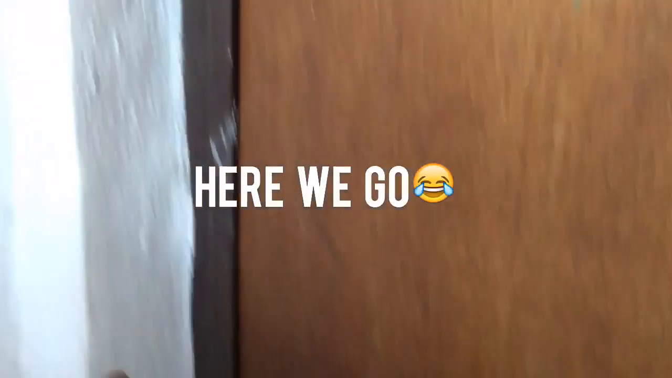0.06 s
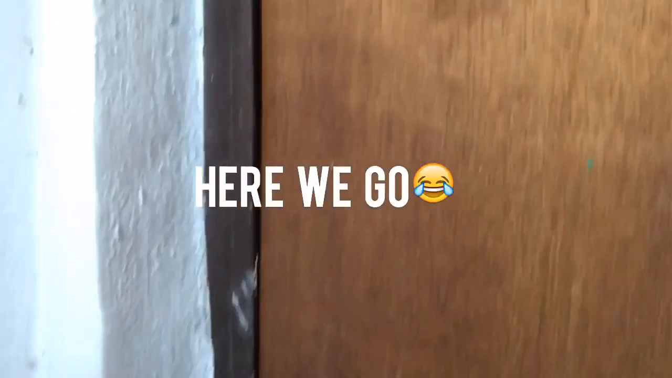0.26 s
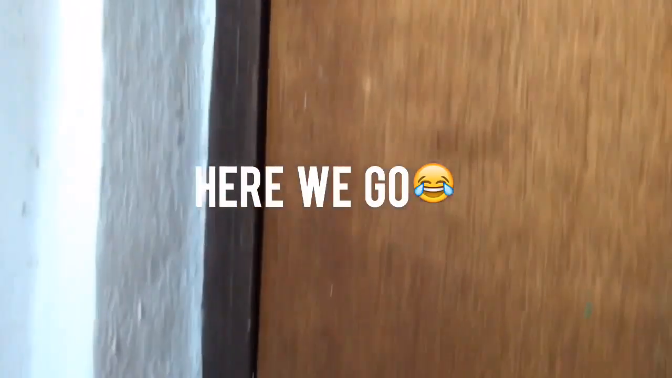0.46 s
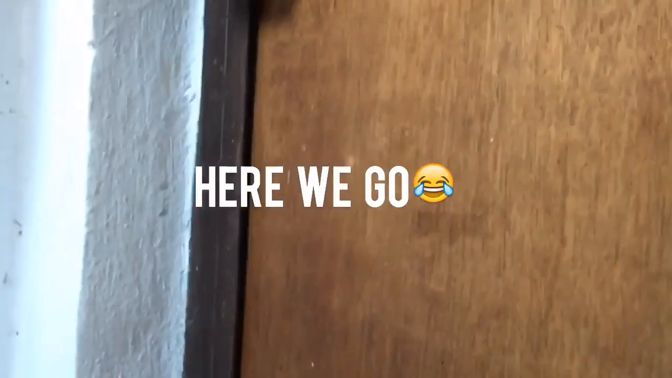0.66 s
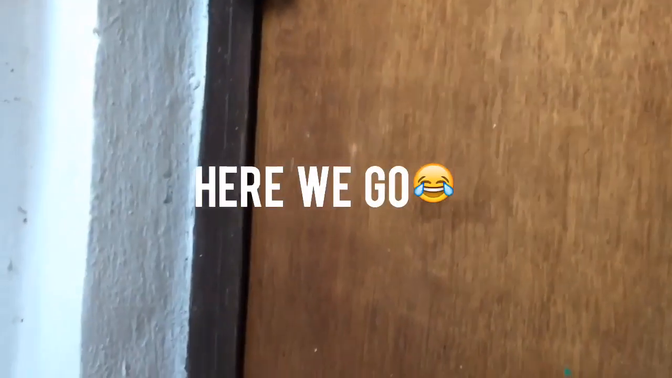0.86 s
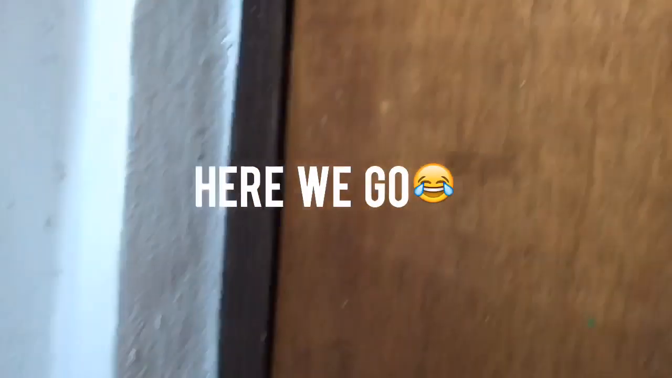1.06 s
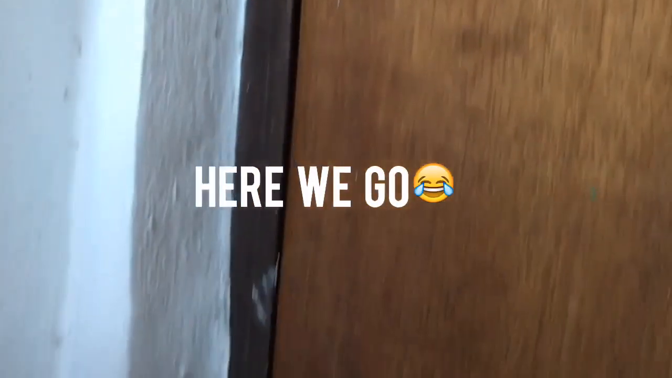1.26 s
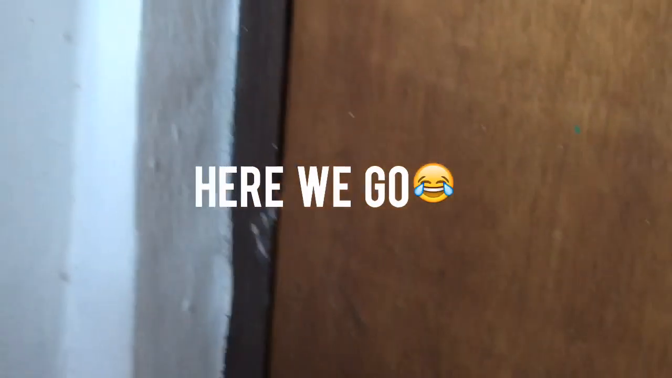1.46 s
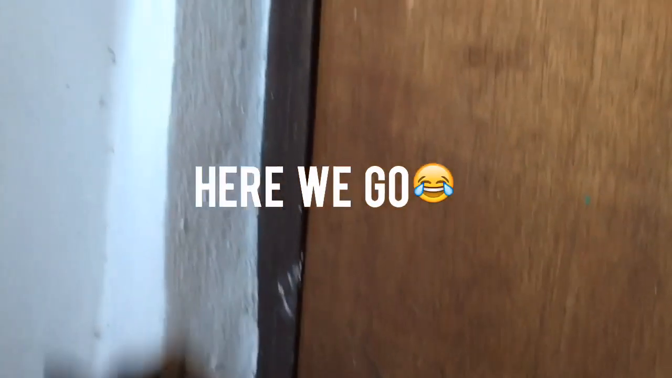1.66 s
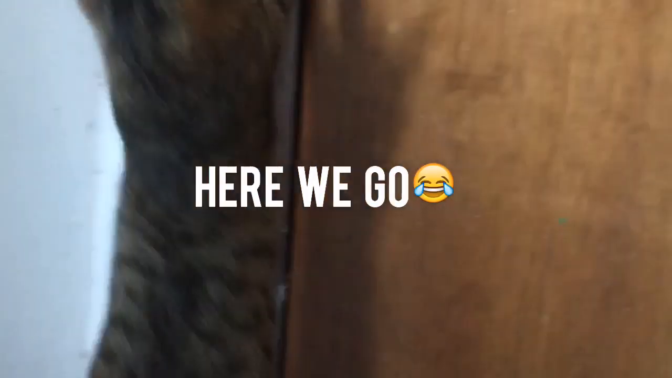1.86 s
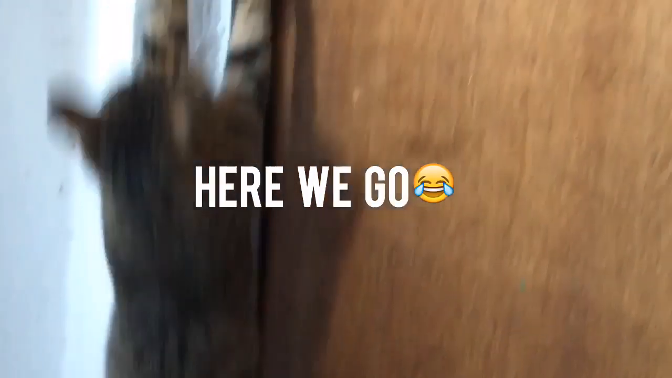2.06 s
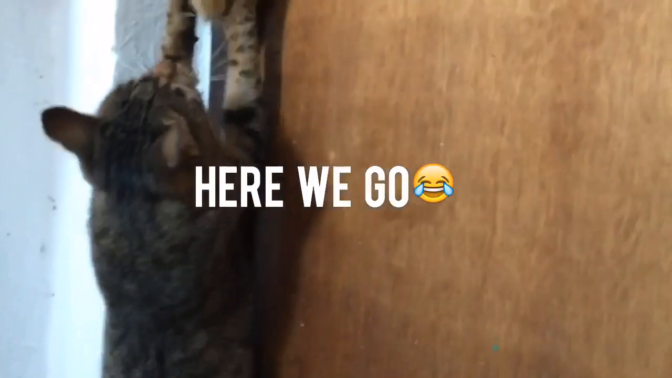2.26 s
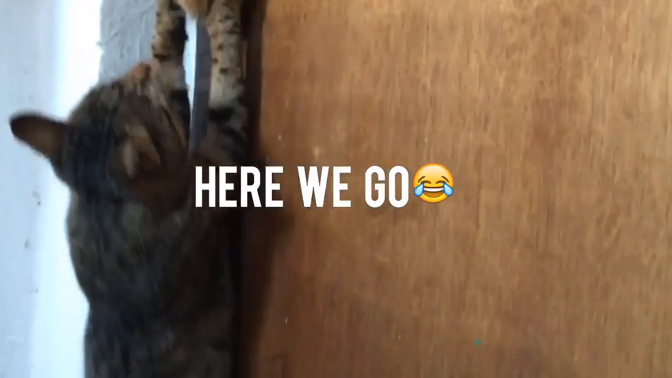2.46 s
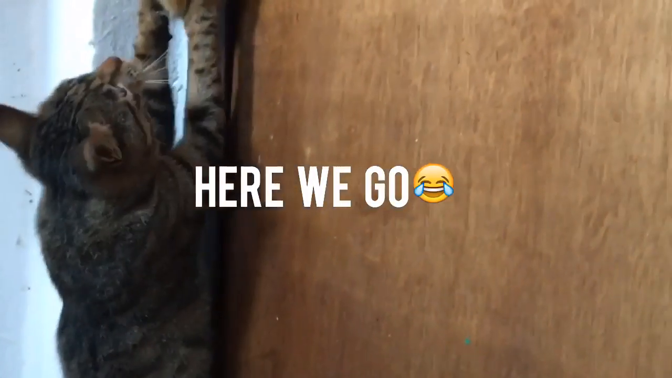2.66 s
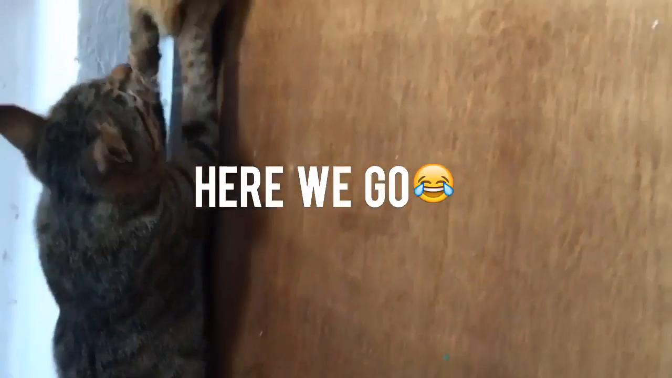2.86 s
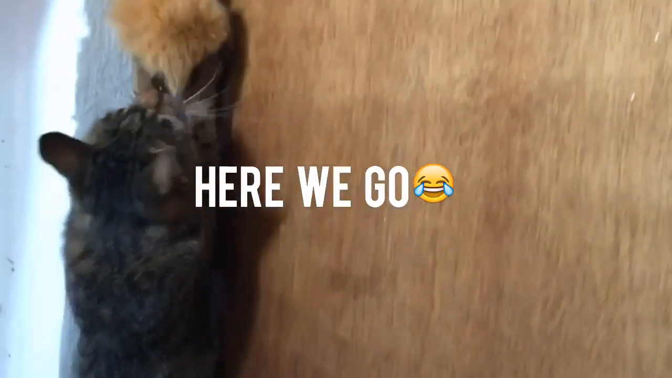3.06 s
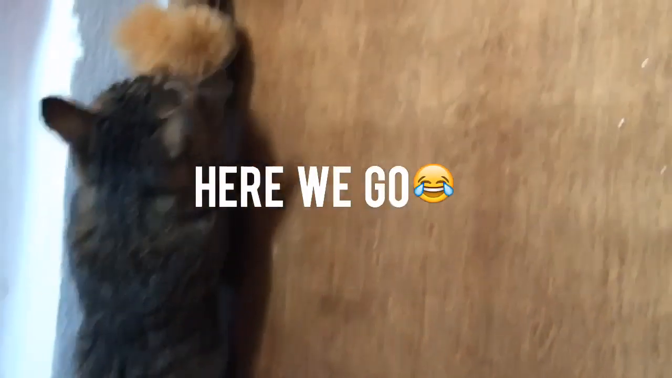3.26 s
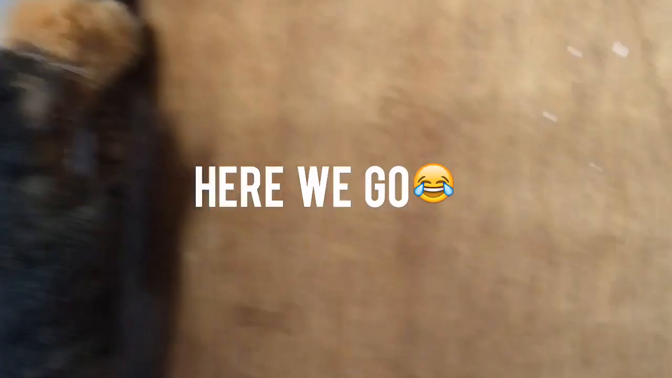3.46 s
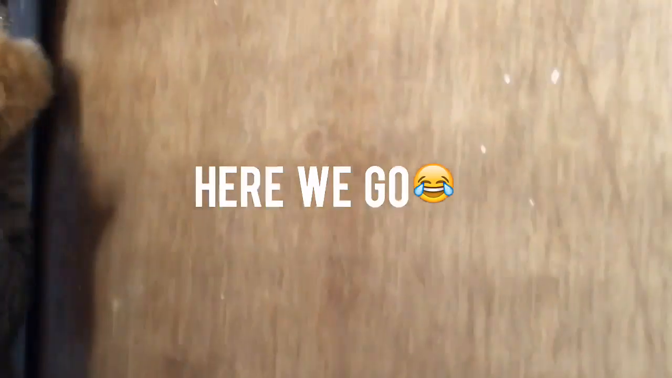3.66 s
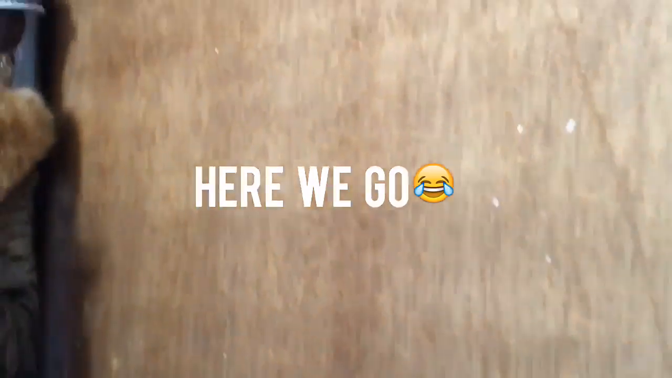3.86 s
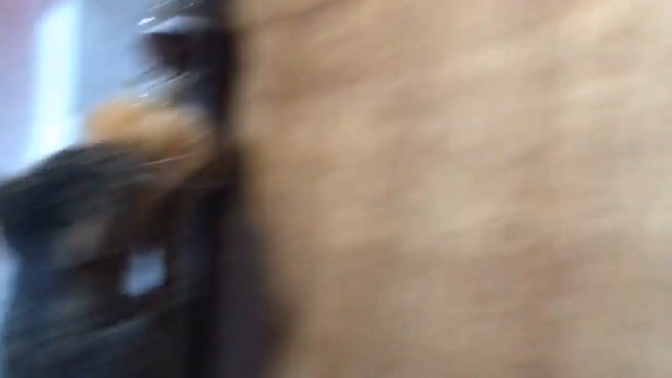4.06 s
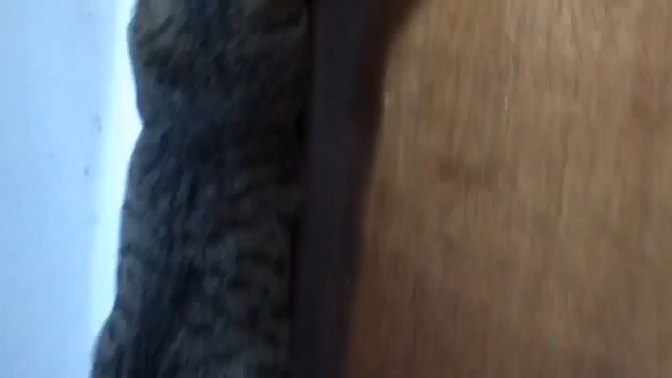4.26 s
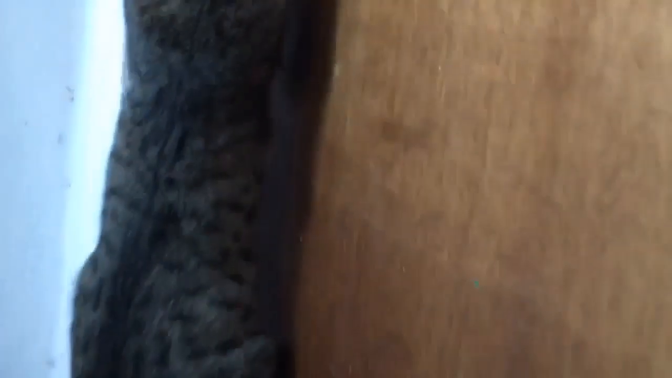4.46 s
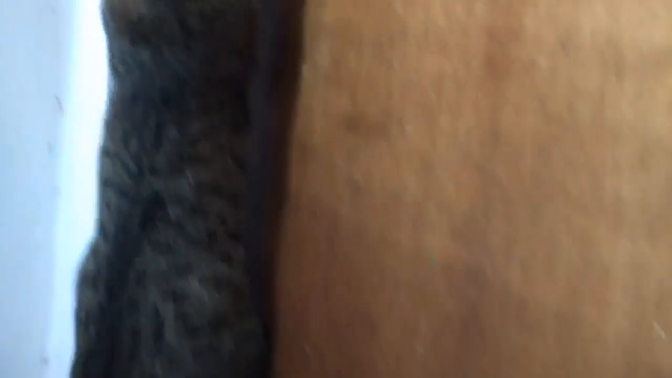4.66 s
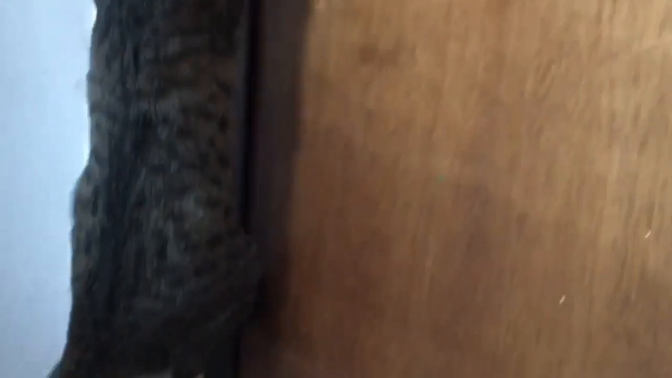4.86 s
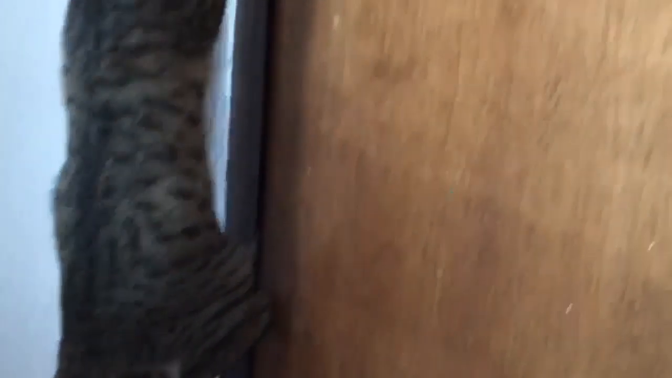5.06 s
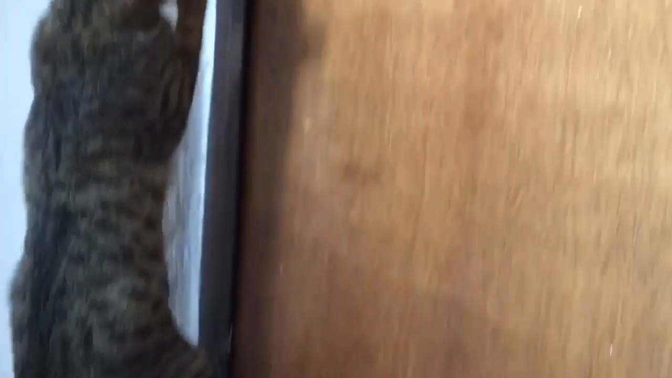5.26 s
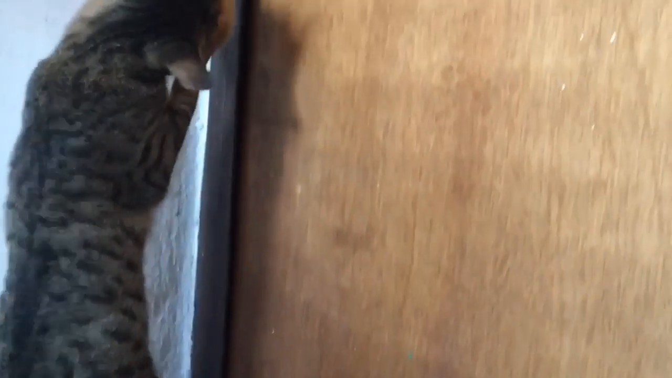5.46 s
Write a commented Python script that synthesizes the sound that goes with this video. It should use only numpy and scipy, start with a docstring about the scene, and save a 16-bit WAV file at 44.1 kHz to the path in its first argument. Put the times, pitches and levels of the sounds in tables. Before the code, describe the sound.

In a small, hard-walled room, a cat gives one soft, level meow. After a pause it leaps at a wooden door: claws rake the wood close to the microphone, and a key squeaks and clinks brightly on its holder amid sharp knocks. The loose door then shudders and thumps in its frame while the cat keeps scratching in short bursts, over a low room rumble.

```python
"""A small hard-walled room. A cat meows once, then leaps at a wooden door and hangs from its key ring.
The meow is a gliding harmonic tone shaped by throat and mouth. Claws and fur scratch down the wood,
close to the microphone, and ring the panel. The steel key squeaks by stick-slip and clinks on its
holder; the door knocks, shudders and thumps in its frame. A low room rumble lies under it all."""
import sys
import numpy as np
from scipy import signal
from scipy.fft import rfft, irfft, next_fast_len
from scipy.io import wavfile
from scipy.ndimage import map_coordinates

SR = 44100
rng = np.random.default_rng(int(sys.argv[2]) if len(sys.argv) > 2 else 0)


def file_out(sig):
    """Save sig as 16-bit WAV at sys.argv[1]."""
    # one column per channel
    cols = np.atleast_2d(sig).T
    # limit, then scale
    lim = np.clip(cols, -1, 1)
    pcm = np.round(lim * 32767).astype(np.int16)
    wavfile.write(sys.argv[1], SR, pcm)


N = 242550  # 5.5 s

# room noise spectrum: f/Hz, level/dB
AIR_SPECTRUM = [(15, -38), (40, -6.5), (77, -1.5), (204, -21), (319, -19.5), (558, -28), (2020, -36.5),
                (16000, -47.5)]
# room decay: f/Hz, t60/s
ROOM_DECAY = [(150, 1), (1000, 0.52), (4000, 0.47), (14000, 0.14)]
# meow contour: t/s, pitch/Hz, level/dB, mouth opening/0-1, tongue resonance/Hz, lip resonance/Hz
MEOW_CONTOUR = [(.793, 470, -60, 0.4, 2840, 5230), (.86, 483.3, -46.5, 1, 2840, 4900),
                (.92, 500, -45.5, 0.75, 3000, 5500), (.97, 501.6, -44.5, 0.79, 3360, 5770),
                (1.03, 507.8, -44, 0.56, 3510, 5950), (1.12, 508.3, -44, 0.57, 3750, 6000),
                (1.19, 501, -46.5, 0.57, 3700, 6020), (1.27, 475, -49.5, 0.51, 3180, 5820),
                (1.34, 467, -55.5, 0.43, 2650, 5170), (1.39, 445.7, -54.5, 0.23, 2284, 4100),
                (1.445, 403, -45, 0.3, 2050, 3650)]
# throat and mouth response: f/Hz, level/dB
THROAT_SPECTRUM = [(450, -12), (1000, 1), (1500, -15), (2000, -4), (2500, -19), (3300, -23), (4500, -22.5),
                   (6700, -32.5), (8200, -29), (9500, -44), (14000, -46)]
# change from closed to open mouth: f/Hz, gain/dB
OPENING_GAIN = [(500, -43), (1000, -19), (1500, 17), (2000, 23), (4000, -6.5)]
# a paw lands and rakes the wood: t/s, hold/s, level/dB, tilt/(dB/oct)
CLAW_SWIPES = [(2.205, 0.076, -59, -2), (2.264, 0.11, -41.5, -5.5), (2.618, 0.035, -51, 0.5),
               (3.185, 0.029, -60.5, 4.5), (3.792, 0.0035, -49.5, -0.5), (3.884, 0.028, -32.5, 0),
               (4.033, 0.052, -33.5, 1), (4.148, 0.019, -50, 11), (4.503, 0.028, -47.5, 12),
               (4.771, 0.05, -50, -1.5), (5.053, 0.07, -46, -2.5), (5.205, 0.053, -57.5, 5)]
# a hooked claw drags ever harder, then lets go: t/s, rise/s, level/dB, tilt/(dB/oct)
CLAW_DRAGS = [(2.282, 0.14, -35, -4.5), (3.957, 0.041, -35, 1), (4.308, 0.11, -41.5, 2),
              (4.97, 0.049, -55.5, 3)]
# a claw snaps free: t/s, level/dB, tilt/(dB/oct)
CLAW_SNAPS = [(3.163, -60, 5.5), (3.343, -52.5, 0), (3.377, -49.5, 1.5), (3.42, -47.5, 1),
              (3.919, -54, 1.5), (4.044, -26.5, 2.5), (4.113, -37, 1), (4.508, -36, 6.5),
              (4.738, -46.5, 3.5), (4.86, -52.5, 7), (5.063, -36, 6), (5.069, -32.5, 6), (5.107, -27.5, 7)]
# claw on wood: f/Hz, level/dB
CLAW_SPECTRUM = [(200, -22.5), (455, -9), (1040, -4), (1500, -4), (2350, -1), (2900, -9), (3500, -3.5),
                 (4700, -9.5), (6620, -7.5), (7820, -11.5), (12300, -12.5), (16000, -21)]
# resonances of the thin door panel: f/Hz
PANEL_MODES_HZ = [480, 575, 705, 965, 1045, 1310, 2060, 2300]
# key holder and paws rap on the frame: t/s, level/dB, favoured f/Hz
FRAME_KNOCKS = [(2.209, -53.5, 1480), (2.411, -37, 2260), (2.493, -30, 1100), (2.499, -29.5, 295),
                (2.523, -32, 313), (2.553, -37, 296), (2.578, -41.5, 296), (2.631, -34, 704),
                (2.666, -46, 856), (2.702, -39.5, 476), (3.801, -50.5, 2300), (3.896, -40, 690),
                (3.92, -35.5, 1250), (3.999, -44, 2500), (4.049, -42, 2120)]
# wooden frame: f/Hz, level/dB, t60/s
FRAME_MODES = [(301, 1.5, 0.12), (460, 1, 0.053), (710, -5, .085), (870, 2, 0.03), (1110, -2, .04),
               (1273, 0.5, 0.049), (1705, 2.5, .04), (2100, 1.5, 0.017), (2590, -3.5, 0.059)]
# key and ring meet: t/s, level/dB, relative click level/dB, favoured f/Hz
KEY_CLINKS = [(2.221, -58, 11, 11580), (2.278, -40.5, -4, 11500), (2.392, -21.5, 5, 12300),
              (2.411, -22, -9, 9500), (2.4225, -15, -9, 11800), (2.446, -30.5, -1, 12300),
              (2.477, -43.5, 5, 12500), (2.518, -40, 4.5, 12280), (2.621, -28, 2, 13000),
              (2.631, -27, 3.5, 9600), (2.693, -52.5, 1.5, 9720), (2.702, -46, 12, 12500),
              (2.718, -41.5, 10, 10790), (3.598, -55, 0.5, 13000), (3.646, -45, 2.5, 13300),
              (4.445, -62.5, 9.5, 12000)]
# steel key: f/Hz, level/dB, t60/s
STEEL_MODES = [(6850, -14.5, .07), (9100, -5.5, 0.046), (10960, -5.5, 0.036), (11700, -15.5, .1),
               (12000, -5.5, 0.064), (12465, -6, .08), (12640, -4, .06), (13500, -7.5, 0.034),
               (14920, -2, .03), (15530, -6, .04)]
# the ring slides on its holder: t/s, hold/s, level/dB, squeak f/Hz, roughness/0-1
RING_SLIDES = [(2.266, .074, -39, 12500, .75), (2.346, 0.018, -17, 12400, .2),
               (2.368, 0.054, -25, 12080, .65), (2.372, .005, -28.5, 9040, .2),
               (2.412, .007, -23, 11980, .5), (2.609, .008, -44, 9700, .95)]
# steel contact noise: f/Hz, level/dB
STEEL_SPECTRUM = [(3500, -29), (6500, -12), (9000, -2), (13000, 4), (16000, -7)]
# the cat's weight leans on the door: t/s, hold/s, level/dB, t60/s
DOOR_SHOVES = [(2.392, 0.044, -45.5, 1), (2.688, .01, -33.5, 0.23), (2.84, 0.16, -34, 0.4),
               (3.305, 0.13, -37, 0.63), (3.592, 0.023, -36, 0.55), (3.924, 0.072, -28.5, 0.18),
               (4.232, 0.15, -37.5, 1), (4.707, 0.05, -34.5, 0.82)]
# the cat's body brushes the door: t/s, hold/s, level/dB
FUR_BRUSHES = [(2.576, 0.1, -52), (3.558, 0.085, -59), (4.298, 0.045, -50), (5.175, 0.067, -63.5)]
# fur on wood: f/Hz, level/dB
FUR_SPECTRUM = [(100, -5), (300, 7), (1300, 4), (2300, -1), (3500, -13), (16000, -13.5)]
# paws and body hit the door: t/s, level/dB, low-pass f/Hz
DOOR_THUMPS = [(2.657, -29, 141), (2.701, -36, 130.3), (2.822, -34, 89.6), (3.343, -23.5, 297),
               (3.377, -25, 556), (3.406, -34, 377), (3.448, -31.5, 199), (3.911, -27, 242),
               (3.945, -20, 234), (4.052, -25, 210), (4.107, -33, 164), (4.661, -28, 105)]
# whole door: f/Hz, level/dB, t60/s
DOOR_MODES = [(47.24, -13, 0.15), (79.2, 10.5, 0.42), (102.4, 15, 0.087), (119.8, -2, 0.35),
              (182.6, 0, 0.319), (239.7, -7, 0.3), (294, -4, 0.19), (341, -2, 0.19)]


def amp(db):
    """Decibels to gain."""
    return 10 ** (np.asarray(db) / 20)


def unit(x):
    """Scale to rms 1."""
    return x / np.sqrt(np.mean(x ** 2) + 1e-20)


def along(points, hz):
    """Interpolate (f/Hz, value) points on a log axis."""
    f, values = np.transpose(points)
    return np.interp(np.log(hz + 1), np.log(f + 1), values)


def wobble(rate_hz, size=N):
    """Smooth random curve, rate_hz knots a second."""
    knots = rng.standard_normal(int(size * rate_hz / SR) + 4)
    return map_coordinates(knots, [np.arange(size) * rate_hz / SR])


def filtered(x, response):
    """Apply a gain given as a function of frequency."""
    size = next_fast_len(len(x) + SR // 4)
    return irfft(rfft(x, size) * response(np.fft.rfftfreq(size, 1 / SR)), size)[:len(x)]


def coloured(x, spectrum, tilt_db_oct=0):
    """Shape x by a spectrum and a tilt; rms 1."""
    return unit(filtered(x, lambda hz: amp(along(spectrum, hz) + tilt_db_oct * np.log2(hz + 1))))


def noise(size, spectrum, tilt_db_oct=0):
    """Coloured Gaussian noise; rms 1."""
    return coloured(rng.standard_normal(size), spectrum, tilt_db_oct)


def grit(size, rate_hz, spread_db):
    """Tiny slips: random times, uneven sizes."""
    slips = (rng.random(size) < rate_hz / SR) * rng.standard_normal(size)
    return slips * amp(spread_db * rng.standard_normal(size))


def fade(t, t60_s):
    """Exponential decay."""
    return np.exp(-np.log(1000) * t / t60_s)


def swell(start_s, hold_s, t60_s, rise_db_per_s):
    """Envelope: grows until start_s, holds, decays."""
    t = np.arange(N) / SR - start_s
    return amp(rise_db_per_s * np.minimum(t, 0)) * fade(np.maximum(t - hold_s, 0), t60_s)


def stroke(t, rise_s, hold_s, t60_s):
    """Contact force: power-law build, hold, release."""
    return np.clip(t / rise_s, 0, 1) ** 1.7 * fade(np.maximum(t - rise_s - hold_s, 0), t60_s)


def ring(modes, t, scatter_db=3, in_step=False):
    """Struck damped modes, starting near rms 1; a broad push starts them in step."""
    hz, db, t60_s = np.transpose(modes)[:, :, None]
    gain = amp(db + scatter_db * rng.standard_normal(db.shape))
    if not in_step:
        gain *= rng.choice([-1, 1], db.shape)
    partials = gain * np.sin(2 * np.pi * hz * t) * fade(t, t60_s)
    return np.sum(partials, 0) / np.sqrt(np.sum(gain ** 2) / 2)


def favouring(modes, centre_hz, fall_db_oct):
    """The struck spot favours modes near centre_hz."""
    return [(hz, db - fall_db_oct * abs(np.log2(hz / centre_hz)), t60_s) for hz, db, t60_s in modes]


def add(track, start_s, sound):
    """Mix a sound in at start_s."""
    part = track[round(start_s * SR):][:len(sound)]
    part += sound[:len(part)]


def air(level_db=-58):
    """Low, slightly restless room rumble under thin hiss."""
    return amp(level_db + 0.52 * wobble(5.5)) * noise(N, AIR_SPECTRUM)


def meow(scoop_s=0.016, release_s=0.046):
    """Harmonic voice: drops onto its note, brightens with effort and opening, creaks at both ends."""
    t = np.arange(N) / SR
    times_s, *columns = np.transpose(MEOW_CONTOUR)
    pitch_hz, db, mouth, tongue_hz, lip_hz = [np.interp(t, times_s, column) for column in columns]
    start_s, end_s = times_s[0], times_s[-1]
    gate = (t >= start_s) & (t <= end_s)
    creak = np.exp(-((t - start_s) / 0.016) ** 2) + np.exp(-((t - end_s) / 0.02) ** 2)
    pitch_hz *= 1 + 0.0022 * wobble(55) + (0.004 + 0.08 * creak) * wobble(700)
    scoop = 1 + 0.18 * np.exp(-np.abs(t - start_s) / scoop_s)
    phase = 2 * np.pi * np.cumsum(pitch_hz * scoop)[gate] / SR
    effort_db = db[gate] - db.max()
    voice, power = np.zeros(N), np.zeros(N)
    for k in range(1, 31):
        hz = k * pitch_hz[gate]
        opening_db = along(OPENING_GAIN, hz) * (mouth[gate] - 0.6)
        tongue_db = 8.5 * np.exp(-((hz - tongue_hz[gate]) / 400) ** 2)
        lip_db = 13.3 * np.exp(-((hz - lip_hz[gate]) / 350) ** 2)
        treble_db = 0.6 * effort_db * np.clip(np.log2(hz / 2000), 0, 1)
        waver_db = np.clip(k / 2, 1.2, 2.8) * wobble(20, len(hz))
        gain = amp(along(THROAT_SPECTRUM, hz) + opening_db + tongue_db + lip_db + treble_db + waver_db)
        voice[gate] += gain * np.sin(k * phase)
        power[gate] += gain ** 2 / 2
    release = np.clip((end_s - t) / release_s, 0, 1)
    rasp = noise(N, [(300, -25), (620, -1), (1900, -22), (2600, -37), (9000, -44)])
    return gate * (amp(db) * release * voice / np.sqrt(power + 1e-12) + amp(-56) * creak * rasp)


def near_walls(x, gain=0.12):
    """Early floor and wall reflections: harmonics swell and sink as the pitch glides."""
    delays = rng.integers(SR // 200, SR // 25, 8)
    return x + gain * sum(np.pad(x, (delay, 0))[:N] for delay in delays)


def room(x):
    """Wall reverberation: each frequency decays at its own rate."""
    hz, t, bins = signal.stft(rng.standard_normal(SR * 3 // 4), SR, nperseg=256)
    tail = signal.istft(bins * fade(t, along(ROOM_DECAY, hz)[:, None]), SR, nperseg=256)[1]
    tail = np.pad(tail, (SR // 200, 0))
    return signal.fftconvolve(x, tail / np.linalg.norm(tail))[:N]


def moving_echo(x, rate_hz=0.6):
    """The echo shifts as the cat moves: two room responses, crossfaded."""
    angle = 2 * np.pi * rate_hz * np.arange(N) / SR
    return room(x * np.cos(angle)) + room(x * np.sin(angle))


def on_wood(x):
    """Each spot of the door adds its own narrow peaks and dips."""
    ripple_db = 2.9 * rng.standard_normal(130)
    return unit(filtered(x, lambda hz: amp(map_coordinates(ripple_db, [0.8 * np.sqrt(hz)]))))


def travelling(make_sound, spots_per_s=18):
    """Moving contact point: three versions of a sound in drifting shares."""
    versions = np.array([make_sound() for _ in range(3)])
    shares = np.array([wobble(spots_per_s, len(version)) for version in versions])
    return np.sum(versions * shares, 0) / np.linalg.norm(shares, axis=0)


def scrape(force, tilt_db_oct):
    """A claw crosses the grain: dense tiny slips, a few hard catches."""
    def spot():
        slips = unit(grit(len(force), rate_hz=7000, spread_db=2))
        catches = unit(grit(len(force), rate_hz=250, spread_db=1))
        return on_wood(coloured(slips + 0.38 * catches, CLAW_SPECTRUM, tilt_db_oct))
    return force * travelling(spot)


def claws():
    """Claws swipe the wood, drag while hooked, snap free."""
    out, t = np.zeros(N), np.arange(SR // 2) / SR
    for start_s, hold_s, db, tilt_db_oct in CLAW_SWIPES:
        force = stroke(t, rise_s=0.0075, hold_s=hold_s, t60_s=0.04)
        add(out, start_s, amp(db) * scrape(force, tilt_db_oct))
    for start_s, rise_s, db, tilt_db_oct in CLAW_DRAGS:
        force = stroke(t, rise_s, hold_s=0, t60_s=0.019)
        add(out, start_s, amp(db) * scrape(force, tilt_db_oct))
    for start_s, db, tilt_db_oct in CLAW_SNAPS:
        snap = on_wood(noise(len(t), CLAW_SPECTRUM, tilt_db_oct))
        add(out, start_s, amp(db) * snap * (fade(t, 0.036) + 0.31 * fade(t, 0.156)))
    return out


def panel(x, width_hz=32):
    """The thin door panel rings under every scrape."""
    ringing = sum(signal.lfilter(*signal.iirpeak(hz, hz / width_hz, fs=SR), x) for hz in PANEL_MODES_HZ)
    return amp(-0.5) * x + amp(-1.5) * ringing


def knocks():
    """Sharp raps on the wooden frame, with little bass."""
    out, t = np.zeros(N), np.arange(SR // 2) / SR
    for start_s, db, centre_hz in FRAME_KNOCKS:
        body = ring(favouring(FRAME_MODES, centre_hz, fall_db_oct=11.5), t, scatter_db=1)
        crack = noise(len(t), [(400, -5.5), (2400, -9.5), (4000, -26.5), (12000, -17)])
        add(out, start_s, amp(db) * (1.04 * body + 0.58 * crack * fade(t, 0.099)))
    return signal.lfilter(*signal.butter(2, 220, "high", fs=SR), out)


def clinks():
    """Key strikes ring: a hard click plus steel modes."""
    out, t = np.zeros(N), np.arange(SR // 3) / SR
    for start_s, db, click_db, centre_hz in KEY_CLINKS:
        click = noise(len(t), STEEL_SPECTRUM) * (fade(t, 0.016) + 0.31 * fade(t, 0.1))
        body = ring(favouring(STEEL_MODES, centre_hz, fall_db_oct=17.5), t, scatter_db=5)
        add(out, start_s, amp(db) * (body + amp(click_db) * click))
    return out


def squeak(hz, roughness, size):
    """Stick-slip locks onto one steel mode; roughness blurs and breaks the note."""
    jitter = roughness * (0.025 * wobble(900, size) + 0.02 * wobble(90, size))
    phase = 2 * np.pi * np.cumsum(hz * (1 + jitter)) / SR
    return unit(np.sin(phase) * amp(6 * roughness * wobble(220, size)))


def slides():
    """Steel sticks and slips on steel: a high squeak over grating."""
    out, t = np.zeros(N), np.arange(SR // 3) / SR
    slips = lambda: grit(len(t), rate_hz=2500, spread_db=3)
    damped = [(hz, db, t60_s / 4) for hz, db, t60_s in STEEL_MODES]  # pressed by the sliding ring
    for start_s, hold_s, db, hz, roughness in RING_SLIDES:
        ringing = unit(signal.fftconvolve(slips(), ring(damped, t))[:len(t)])
        grating = unit(ringing + amp(-2.5) * coloured(slips(), STEEL_SPECTRUM))
        friction = unit(roughness * grating + (1 - roughness / 2) * squeak(hz, roughness, len(t)))
        force = stroke(t, rise_s=0.0059, hold_s=hold_s, t60_s=0.067)
        add(out, start_s, amp(db) * force * friction)
    return out


def shudder(mode_hz=70.8):
    """Shoves swing the loose door at a low mode; it chatters faintly in the frame."""
    shoves = [amp(db) * swell(start_s, hold_s, t60_s, rise_db_per_s=195.5)
              for start_s, hold_s, db, t60_s in DOOR_SHOVES]
    phase = 2 * np.pi * np.cumsum(mode_hz * (1 + 0.014 * wobble(9.7))) / SR
    chatter = noise(N, [(20, -18.5), (45, 4.5), (120, 0.5), (185, -9), (260, -30.5), (3000, -42)])
    return np.max(shoves, axis=0) * (np.sqrt(2) * np.sin(phase) + amp(-9.5) * chatter)


def fur():
    """The cat's body brushes the door in soft, uneven swells."""
    pressure = sum(amp(db) * swell(start_s, hold_s, t60_s=0.795, rise_db_per_s=102.5)
                   for start_s, hold_s, db in FUR_BRUSHES)
    return pressure * amp(0.64 * wobble(25)) * travelling(lambda: on_wood(noise(N, FUR_SPECTRUM)))


def thumps():
    """Soft blows ring the door; softer contact, duller thump."""
    out, t = np.zeros(N), np.arange(SR) / SR
    attack = 1 - fade(t, 0.0073)
    for start_s, db, cutoff_hz in DOOR_THUMPS:
        thud = noise(len(t), [(15, 6), (60, 14.5), (350, -5), (600, -8.5)]) * fade(t, 0.29)
        blow = attack * (ring(DOOR_MODES, t, scatter_db=0, in_step=True) + 1.34 * thud)
        add(out, start_s, amp(db) * signal.lfilter(*signal.butter(2, cutoff_hz, fs=SR), blow))
    return signal.lfilter(*signal.butter(2, 42, "high", fs=SR), out)


def scene():
    """Mono mix: cat, key and door with their echo, over room noise."""
    voice = near_walls(meow())
    scratch = panel(claws() + fur())
    wood = knocks() + thumps()
    steel = clinks() + slides()
    echo = moving_echo(amp(-9.5) * (voice + wood) + amp(-8.5) * (scratch + steel))
    return (air() + voice + scratch + wood + steel + shudder() + echo)[None]


def record(dry):
    """Microphone band limit."""
    top_hz = 15900
    return np.array([filtered(x, lambda hz: hz < top_hz) for x in dry])


dry = scene()
out = record(dry)
file_out(out)
```